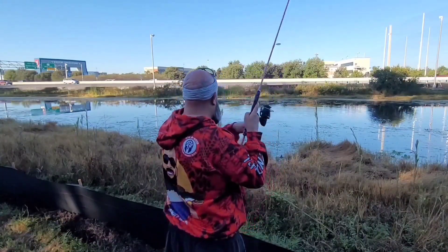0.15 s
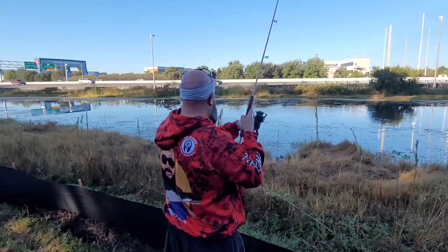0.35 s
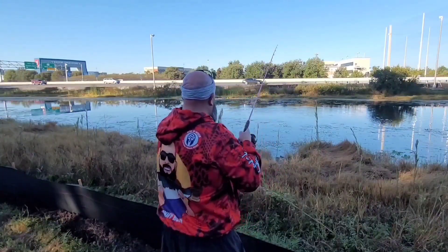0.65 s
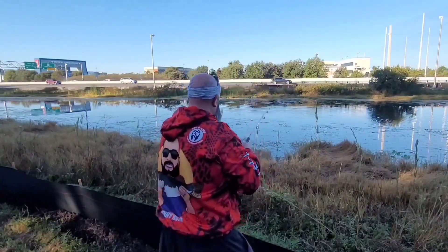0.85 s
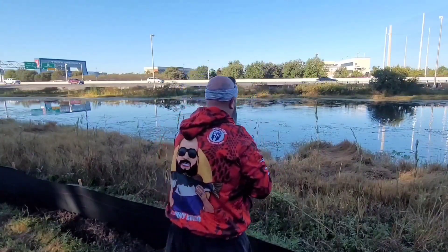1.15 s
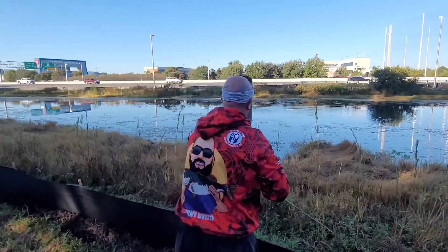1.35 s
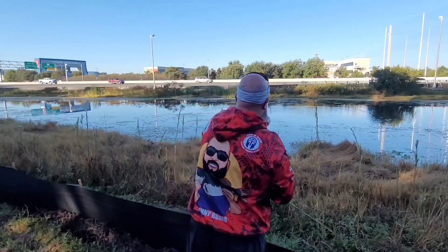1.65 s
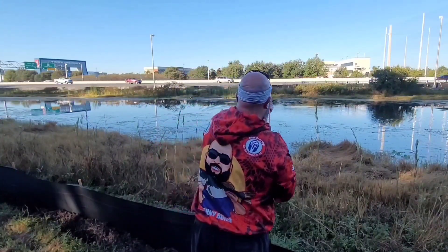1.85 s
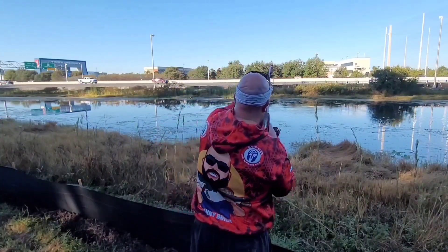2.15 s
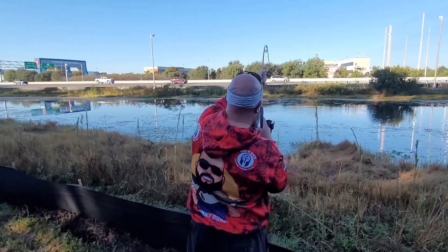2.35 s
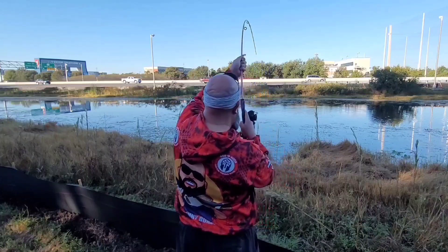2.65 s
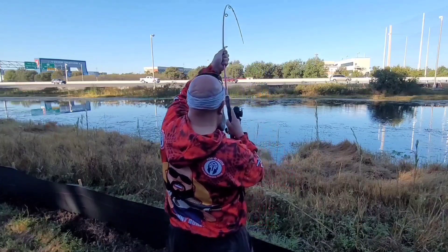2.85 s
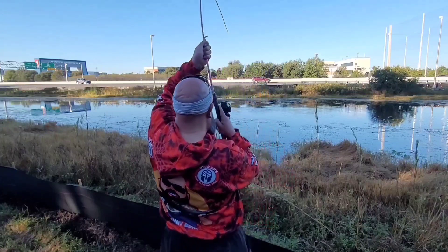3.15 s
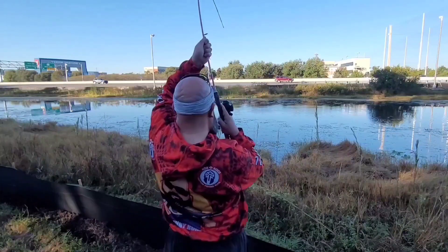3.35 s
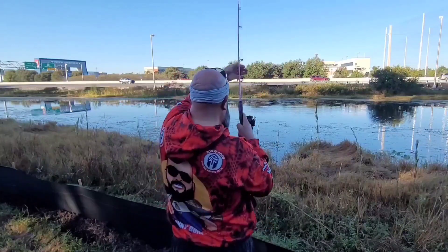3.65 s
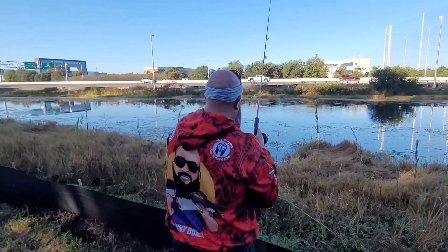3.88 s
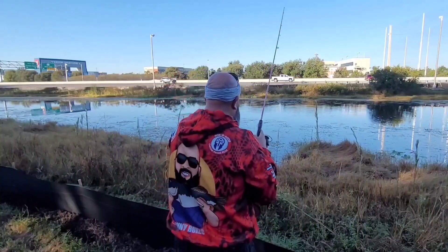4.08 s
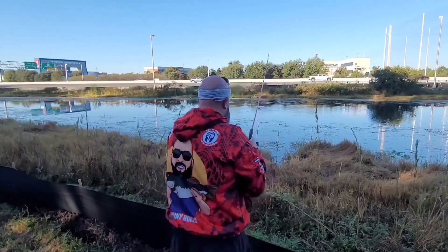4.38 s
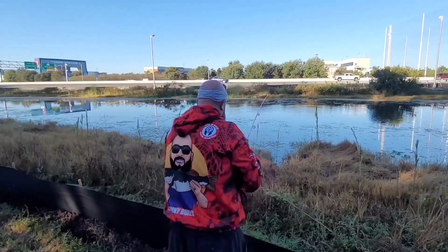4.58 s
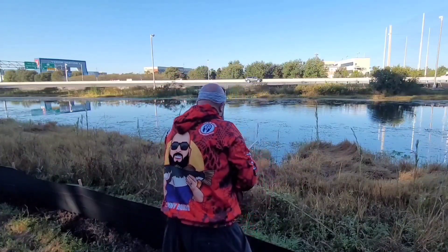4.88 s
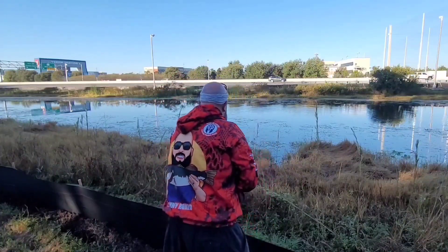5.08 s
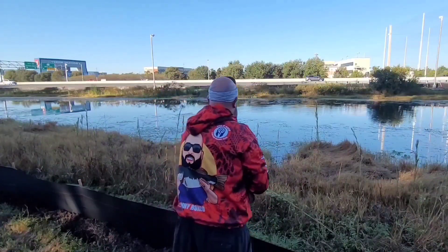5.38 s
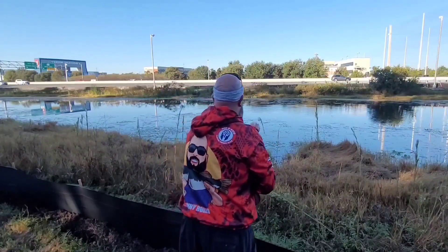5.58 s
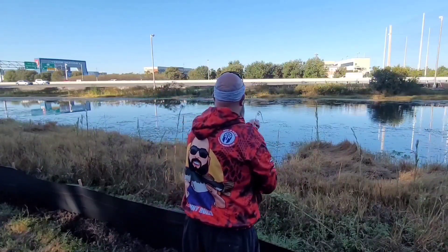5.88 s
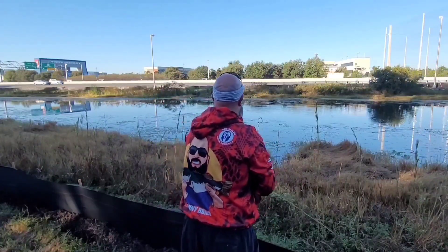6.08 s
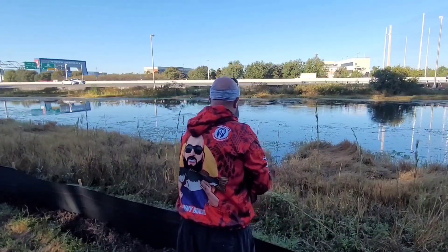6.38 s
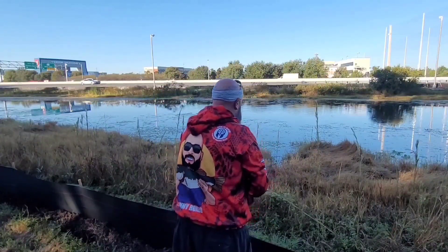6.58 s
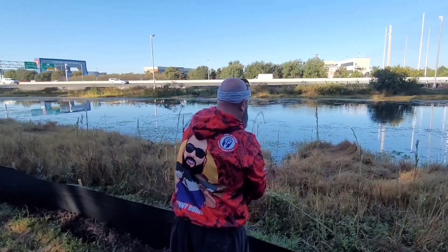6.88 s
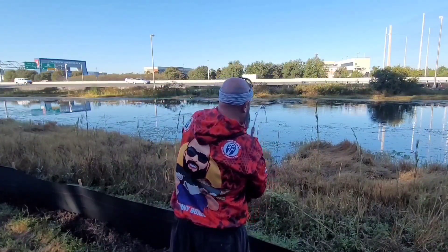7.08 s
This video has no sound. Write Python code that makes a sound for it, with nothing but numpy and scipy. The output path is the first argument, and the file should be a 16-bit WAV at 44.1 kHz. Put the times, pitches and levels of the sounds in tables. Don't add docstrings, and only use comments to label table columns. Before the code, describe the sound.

Broad, dull traffic wash dominates from start to end, gently swelling, with a buzzy low engine drone breaking up in short dips. A soft click comes early, with others scattered later, beside faint cloth rubbing and grass brushing from an angler. A mid-pitched tyre tone enters in the second half and drifts downward. Open air, stereo microphone on the near bank, road far away, no echo, almost inaudible crickets.

```python
import sys
import numpy as np
from scipy import signal
from scipy.fft import rfft, irfft
from scipy.io import wavfile
from scipy.ndimage import uniform_filter1d

SR = 44100
rng = np.random.default_rng(int(sys.argv[2]) if len(sys.argv) > 2 else 0)


def materialize(psi):
    bounded = np.clip(np.atleast_2d(psi).T, -1, 1)
    quanta = np.round(bounded * 32767).astype(np.int16)
    wavfile.write(sys.argv[1], SR, quanta)


def volts(x):
    e = np.asarray(x, float) / 20
    return 10 ** e


N = 318843


def evened(x):
    return x / np.sqrt(np.mean(x ** 2) + 1e-20)


def read(points, hz):
    f, value = np.transpose(points)
    return np.interp(np.log(hz + 1), np.log(f + 1), value)


def along(rows, t):
    s, *columns = np.transpose(rows)
    return [np.interp(t, s, column) for column in columns]


def drift(fastest_hz):
    t = np.arange(N) / SR
    rates = np.geomspace(fastest_hz / 8, fastest_hz, 12)
    return evened(sum(np.sin(2 * np.pi * (f * t + rng.random())) for f in rates))


def coloured(x, points):
    gain = volts(read(points, np.fft.rfftfreq(N, 1 / SR)))
    return irfft(rfft(x) * gain, N)


def at_ports(x, right_lead_s):
    t = np.arange(N) / SR
    left = np.interp(t - right_lead_s, t, x)
    return np.array([left, x])


def crickets():
    centre_hz, width_hz, pulse_hz, level_db = 4289, 262.5, 32.5, -67.5
    beat = np.cos(2 * np.pi * np.cumsum(pulse_hz + 0.29 * drift(0.71)) / SR)
    edges_hz = [centre_hz - width_hz / 2, centre_hz + width_hz / 2]
    wing = signal.butter(2, edges_hz, "band", fs=SR, output="sos")
    song = signal.sosfilt(wing, rng.standard_normal((2, N))) * (1 + 0.17 * beat)
    return volts(level_db) * evened(song)


def rubbing(rows, rest_db, rising_share, fade_s):
    t = np.arange(N) / SR
    power = volts(rest_db) ** 2
    for start, length, db in rows:
        rise = np.sin(np.pi / 2 * np.clip((t - start) / (rising_share * length), 0, 1))
        fall = np.exp(-np.maximum(t - start - length, 0) / fade_s)
        power = power + (volts(db) * rise) ** 2 * fall
    return 10 * np.log10(power)


def rustle(level_db, colour, crackle_db, grain_s):
    grain = uniform_filter1d(rng.standard_normal(N), size=round(grain_s * SR))
    crackle = volts(crackle_db * evened(grain))
    rub = rng.standard_normal((2, N)) + 0.33 * rng.standard_normal(N)
    return volts(level_db) * evened(coloured(rub * crackle, colour))


# [f/Hz, level/dB per Hz]
CLOTH_SPECTRUM = [(3000, -11.5), (6000, -4.5), (9000, -1.5), (11000, -4.5), (13000, -7), (14500, -2),
                  (15700, -2.5)]
# [start t/s, length t/s, level/dB]
SLEEVE_STROKES = [(.12, 0.12, -86.5), (.95, .12, -81), (1.05, .07, -73), (1.08, .26, -78), (1.4, .22, -85),
                  (1.5, .9, -90), (1.8, .1, -85), (1.98, .12, -84), (2.6, .5, -86), (3.55, .6, -87),
                  (2.92, .18, -80.5), (3.08, 0.2, -71.5), (3.27, .15, -74.5), (3.38, .14, -76.5),
                  (3.77, .07, -78), (4.12, 0.21, -78), (4.33, .06, -75.5), (4.4, 0.27, -82.5),
                  (4.7, .45, -86.5), (6.5, .5, -88.5), (5.12, 0.41, -79.5), (5.7, .2, -86)]
# [f/Hz, level/dB per Hz]
GRASS_SPECTRUM = [(2000, -19), (3500, 0), (5000, 3.5), (6500, -4), (7500, -10), (8800, -13.5), (10000, -23),
                  (13000, -36.5)]
# [start t/s, length t/s, level/dB]
GRASS_BRUSHES = [(.12, 0.065, -65.5), (.44, 0.091, -67.5), (.61, 0.043, -66), (.93, 0.056, -69.5),
                 (1.08, 0.053, -70.5), (1.82, 0.067, -65.5), (2.0, 0.061, -67.5), (2.14, .1, -70.5),
                 (2.28, .12, -67.5), (2.57, 0.1, -69.5), (2.8, .22, -68), (3.03, 0.25, -63),
                 (3.41, .2, -69.5), (4.1, .3, -70), (4.5, .2, -72), (5.64, .35, -64), (6.12, 0.38, -66.5),
                 (6.45, .62, -63), (7.13, 0.13, -62.5)]
# [f/Hz, level/dB per Hz]
LOW_CLOTH_SPECTRUM = [(1500, -29.5), (2400, -6), (3200, 2.5), (4000, -9), (6000, -31)]
# [start t/s, length t/s, level/dB]
SLEEVE_SCUFFS = [
    (.622, .022, -55),
    (.93, .4, -60.5),
    (1.84, .1, -62),
    (2.02, .14, -62),
    (3.05, .25, -63),
    (5.1, .25, -63),
]


def angler():
    sleeve_db = rubbing(SLEEVE_STROKES, rest_db=-95, rising_share=0.55, fade_s=.012) + 7.5
    grass_db = rubbing(GRASS_BRUSHES, rest_db=-74, rising_share=.3, fade_s=0.033) + 2.5
    scuff_db = rubbing(SLEEVE_SCUFFS, rest_db=-90, rising_share=.4, fade_s=.015)
    sleeves = rustle(sleeve_db, CLOTH_SPECTRUM, 2.5, .004)
    grass = rustle(grass_db, GRASS_SPECTRUM, 2.3, 0.012)
    scuffs = rustle(scuff_db, LOW_CLOTH_SPECTRUM, 2.7, .01)
    return sleeves + grass + scuffs


# [t/s, peak level/dB, left-right level/dB, lower body level/dB]
REEL_TICKS = [(.6352, -47.5, 2, 3), (.7261, -64, -1, -8), (1.0894, -62, 0, -5), (1.3899, -55, 4, -15),
              (1.3912, -49, 4, -10), (1.4016, -55, 5, -14), (1.8852, -57, -2, -6), (2.0557, -58, -1, -7),
              (2.1472, -66, 3, 9), (3.7869, -59, 4, -4), (5.261, -61, 2, -4), (5.492, -57, -5, -6),
              (5.8446, -52, -4.5, -12)]


def ticks():
    snap_t60, rattle_t60, rattle_db = .011, .04, -17
    apart = .6
    out, t = np.zeros((2, N)), np.arange(2000) / SR
    high = signal.butter(3, 9000, "high", fs=SR, output="sos")
    body = signal.butter(2, [1900, 9000], "band", fs=SR, output="sos")
    decay = volts(-60 * t / snap_t60) + volts(rattle_db - 60 * t / rattle_t60)
    noise = rng.standard_normal((len(REEL_TICKS), 3, len(t)))
    for (s, db, pan_db, body_db), draw in zip(REEL_TICKS, noise):
        burst = (draw[2] + apart * draw[:2]) * decay
        bright = signal.sosfilt(high, burst)
        dull = signal.sosfilt(body, burst)
        snap = bright / abs(bright).max() + volts(body_db) * dull / abs(dull).max()
        pan = volts([[pan_db / 2], [-pan_db / 2]])
        out[:, round(s * SR):][:, :len(t)] += volts(db) * 2 ** .5 * snap * pan
    return out


# [t/s, f/Hz, level/dB]
TYRE_WHINE = [(3.8, 608, -50), (4.1, 598, -43), (4.5, 586, -45), (4.9, 574, -50), (5.4, 563, -41),
              (6.1, 553, -43), (6.35, 549, -53), (6.8, 544, -45), (7.23, 537, -47)]
# [ratio to whine, start t/s, end t/s, level/dB]
TREAD_PITCHES = [
    (0.96, 4.8, 6.4, -47.5),
    (.868, 4.9, 6.0, -49),
]


def whine():
    t = np.arange(N) / SR
    hz, db = along(TYRE_WHINE, t)
    fade_in = np.clip((t - TYRE_WHINE[0][0]) / .3, 0, 1)
    turns = np.cumsum(hz + 1.9 * drift(5.)) / SR
    song = fade_in * volts(db + 3.1 * drift(8.7)) * np.sin(2 * np.pi * turns)
    for ratio, start, end, row_db in TREAD_PITCHES:
        swell = np.sin(np.pi * np.clip((t - start) / (end - start), 0, 1))
        song += swell * volts(row_db + 3.8 * drift(5.)) * np.sin(2 * np.pi * ratio * turns)
    return at_ports(np.sqrt(2) * song, .0001)


RIGHT_LEAD_S = .0005

# [t/s, f/Hz]
FIRING_RATE = [(0, 117), (1, 119), (1.9, 119.6), (2.7, 117.8), (3.4, 117.7), (3.85, 124.6), (4.2, 124.4),
               (4.6, 123.3), (4.95, 125.5), (5.08, 124), (5.3, 116.3), (5.8, 116.6), (6.4, 115),
               (7.23, 115.1)]
# [t/s, level/dB]
DRONE_LEVEL = [(0, -34), (0.55, -40), (0.9, -29.5), (1.7, -30.5), (1.85, -23), (2.45, -26), (3.1, -22.5),
               (3.45, -24.5), (3.75, -23), (4.15, -21.5), (4.7, -26), (5.05, -21.5), (5.35, -24.5),
               (5.7, -22), (6.0, -26.5), (6.6, -22), (7.23, -26)]
# [centre t/s, length t/s, depth level/dB]
SCREENING = [(1.3, 0.057, -7), (1.57, 0.11, -5), (2.22, .06, -3.5), (2.632, 0.14, -8.5), (3.302, 0.046, -5),
             (3.47, .06, -1), (4.72, .06, -0.5), (5.38, 0.058, -13.5), (5.514, .06, -4.5), (5.66, .06, -7),
             (5.796, .06, -6), (6.412, 0.041, -6.5), (6.505, .05, -7.5), (6.93, .12, -8.5),
             (7.165, 0.055, -22)]
# [multiple of firing rate, start t/s, end t/s, level/dB]
SHAFT_ORDERS = [
    (2.25, 3, 5.66, -40.5),
    (1.625, 0.5, 3.1, -45),
    (1.875, 4.9, 5.9, -37.5),
    (1.75, 6.5, 7.4, -38.5),
    (1.55, 1.5, 3.9, -39.5),
    (2, 6, 6.6, -41.5),
    (1.25, 7, 7.7, -55.5),
    (1.62, 1.3, 1.4, -44),
    (1.2, -.3, 1.5, -43),
]


def truck():
    t = np.arange(N) / SR
    turns = np.cumsum(along(FIRING_RATE, t)[0]) / SR
    screen_db = sum(db * np.exp(-((t - s) / (length / 2)) ** 2) for s, length, db in SCREENING)
    tone_db = along(DRONE_LEVEL, t)[0] + screen_db + 1.1 * drift(14.)
    tone = volts(tone_db) * np.sqrt(2) * np.sin(2 * np.pi * turns)
    orders = np.zeros(N)
    for multiple, start, end, db in SHAFT_ORDERS:
        swell = np.sin(np.pi * np.clip((t - start) / (end - start), 0, 1)) ** 0.49
        level = volts(db + 2.5 * drift(7.)) * np.sqrt(2)
        phase = 2 * np.pi * multiple * turns + 1.2 * drift(6.)
        orders += swell * level * np.sin(phase)
    return at_ports(tone, .00019) + at_ports(orders, RIGHT_LEAD_S)


# [t/s, density level/dB, nearness as extra roar treble level/dB]
TRAFFIC_FLOW = [(0, 0.5, 2), (0.4, -1.5, 3.5), (0.85, -1.3, 4), (1.2, -1.1, 3), (1.6, 0.4, -0.9),
                (1.95, -0.1, -0.5), (2.3, 1, -1.5), (2.85, -0.3, 1.5), (3.2, 2, -2), (3.7, 1, -0.9),
                (4.3, 2, -2), (4.8, 0.8, 0), (5.3, 1.45, -2.5), (5.8, 0.3, 0.5), (6.15, 1.05, -0.9),
                (6.6, 0.1, -0.2), (7.23, -0.8, 2.6)]
# [f/Hz, level/dB per Hz]
RUMBLE_SPECTRUM = [(12, -48.5), (20, -17.5), (38, -6), (80, 10.5), (98, 7.5), (118, -12), (140, -11),
                   (180, -45), (310, -120)]
BOOM_SPECTRUM = [(82, -30), (140, -4), (167, -5.5), (380, -17.5), (490, -44), (840, -120)]
ROAR_SPECTRUM = [(220, -41.5), (380, -7.5), (471, -1), (540, -2.5), (620, 0), (700, 0), (820, 0.5),
                 (950, -1), (1100, -5), (1250, -9), (1400, -12.5), (1640, -21.5), (1900, -29), (2470, -63)]
HISS_SPECTRUM = [(1120, -31), (1900, -2.5), (2130, -3), (2530, -4.5), (3360, -4.5), (3970, -11),
                 (4500, -12), (5000, -18), (5700, -24), (6500, -23), (7500, -33), (8800, -30),
                 (10000, -46.5), (15700, -56.5)]
# [level/dB, dB per dB of density, dB per dB of nearness]
LAYER_SWELLS = [
    (-32, 0.5, -0.02),
    (-34.5, 1.26, 0.5),
    (-34.5, 1.4, 0.25),
    (-55.5, 1.64, 0.82),
]
# [f/Hz, share]
RIGHT_SHARE = [(90, .02), (160, .2), (300, .55), (700, .56), (1000, .64), (1600, .58), (3000, .4),
               (4500, .22), (8000, .08)]
LEFT_SHARE = [(90, .98), (160, .785), (300, .41), (550, .44), (690, .44), (820, .1), (1100, .0)]


def traffic():
    frame, hop = 2048, 512
    left_lead_s, patchy_db = .00019, 1.16
    frames, hz = N // hop + 5, np.fft.rfftfreq(frame, 1 / SR)
    density_db, near_db = along(TRAFFIC_FLOW, np.arange(frames) * hop / SR)
    power = 0
    spectra = (RUMBLE_SPECTRUM, BOOM_SPECTRUM, ROAR_SPECTRUM, HISS_SPECTRUM)
    for spectrum, (level_db, follow, closer) in zip(spectra, LAYER_SWELLS):
        gain = volts(read(spectrum, hz)) ** 2
        swell = volts(level_db + follow * density_db + closer * near_db)[:, None] ** 2
        power = power + swell * gain / gain.sum()
    treble = np.exp(-(np.log((hz + 1) / 1250) / 0.26) ** 2)
    power = power * volts(near_db[:, None] * treble) ** 2

    draws = rng.standard_normal((9, frames, len(hz)))
    patches = uniform_filter1d(uniform_filter1d(draws[8], size=14, axis=0), size=14, axis=1)
    size = np.sqrt(power) * volts(patchy_db * evened(patches))
    right, left, scatter_l, scatter_r = (draws[:4] + 1j * draws[4:8]) * size

    share_r = np.clip(read(RIGHT_SHARE, hz), 0, 1)
    share_l = np.clip(read(LEFT_SHARE, hz), 0, 1 - share_r)
    rest = np.sqrt(np.clip(1 - share_r - share_l, 0, 1))
    right, left = right * np.sqrt(share_r), left * np.sqrt(share_l)
    left_lag = left_lead_s * np.clip(hz / 250, .5, 1)
    port_l = right * np.exp(-2j * np.pi * hz * RIGHT_LEAD_S) + left + rest * scatter_l
    port_r = right + left * np.exp(-2j * np.pi * hz * left_lag) + rest * scatter_r
    z = np.array([port_l.T, port_r.T])
    return volts(4.0) * signal.istft(z, nperseg=frame, noverlap=frame - hop)[1][:, :N]


def scene():
    return traffic() + truck() + whine() + crickets() + angler() + ticks()


def top_cut(x):
    return signal.sosfilt(signal.butter(12, 15740, fs=SR, output="sos"), x)


# [f/Hz, left-right level/dB]
PORT_COLOUR = [(40, -0.5), (150, -0.1), (1500, -0.64), (3900, 0.5), (4800, -1), (7500, 3), (9000, -3.5),
               (12000, 0)]


def record(dry):
    hz = np.linspace(0, SR / 2, 513)
    tilt = volts(read(PORT_COLOUR, hz) / 2)
    taps = np.array([signal.firwin2(511, hz, gain, fs=SR) for gain in (tilt, 1 / tilt)])
    ports = signal.oaconvolve(dry, taps, "same", axes=1)
    return top_cut(ports)


dry = scene()
out = record(dry)
materialize(out)
```